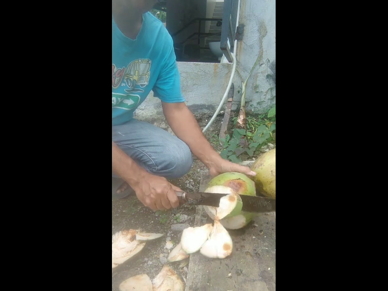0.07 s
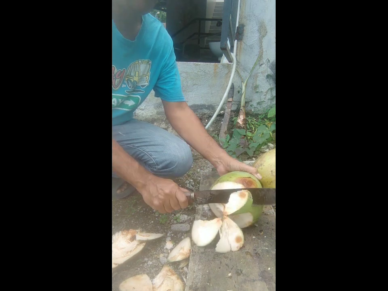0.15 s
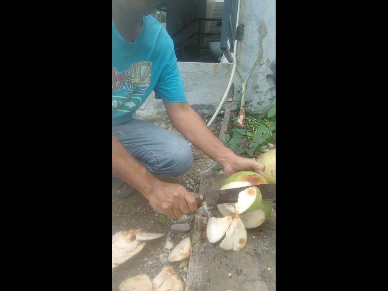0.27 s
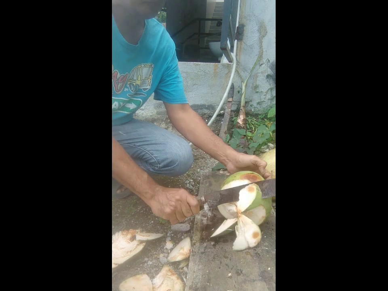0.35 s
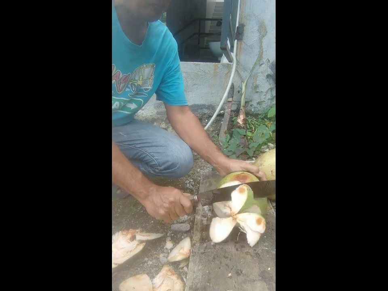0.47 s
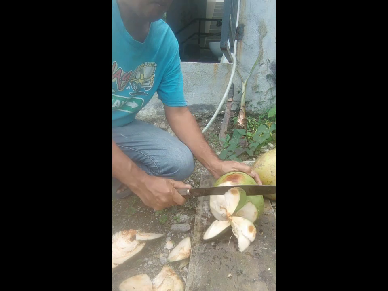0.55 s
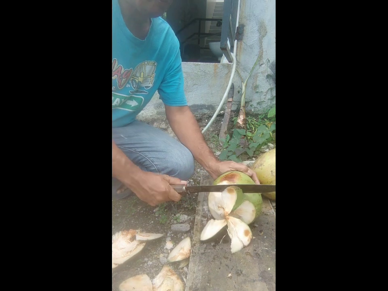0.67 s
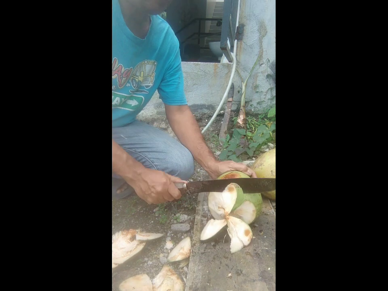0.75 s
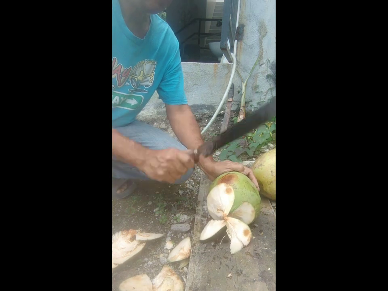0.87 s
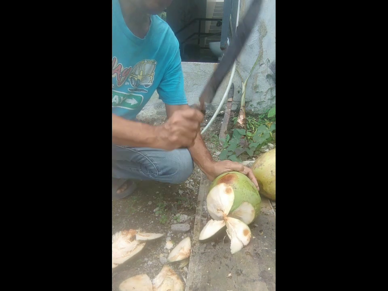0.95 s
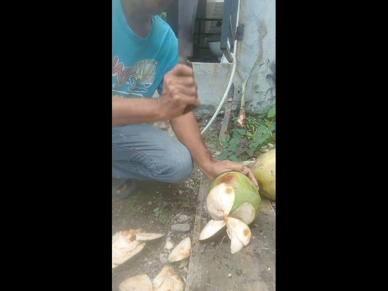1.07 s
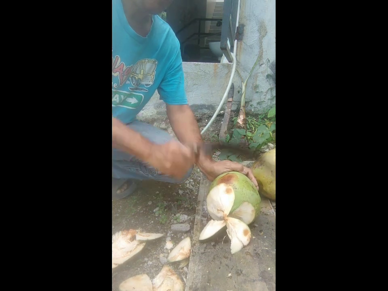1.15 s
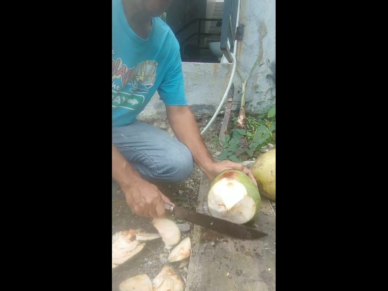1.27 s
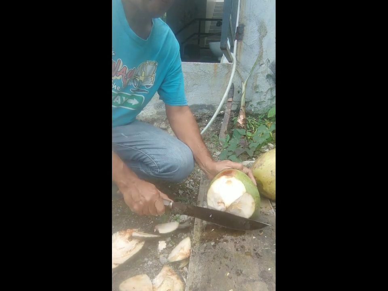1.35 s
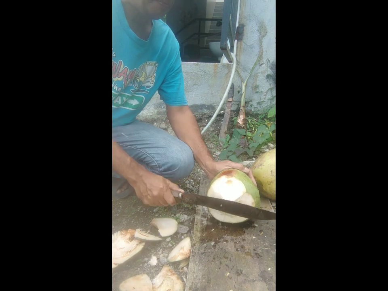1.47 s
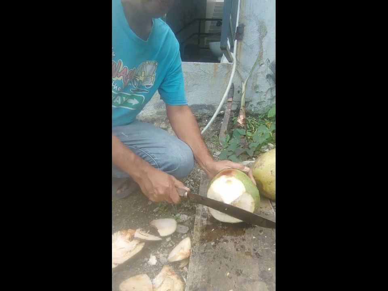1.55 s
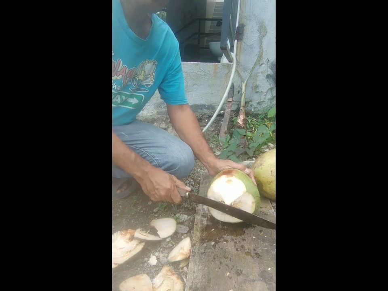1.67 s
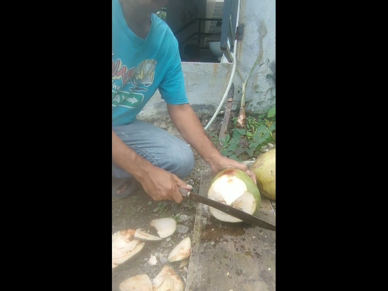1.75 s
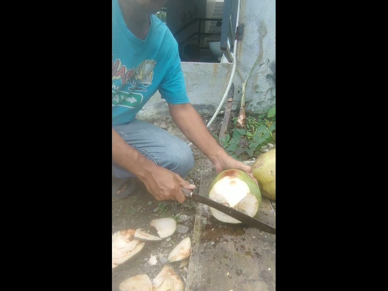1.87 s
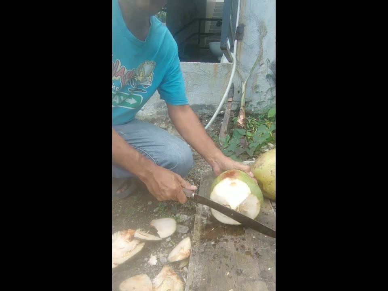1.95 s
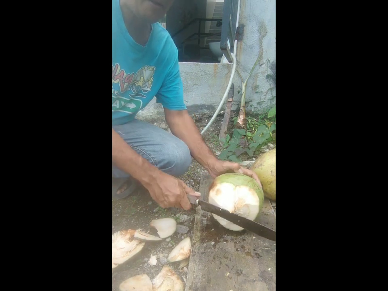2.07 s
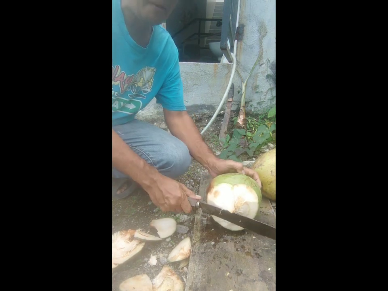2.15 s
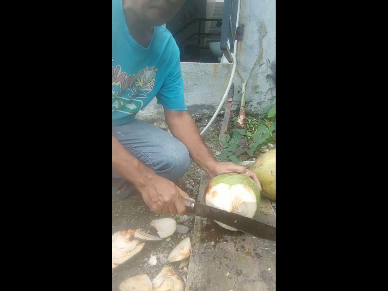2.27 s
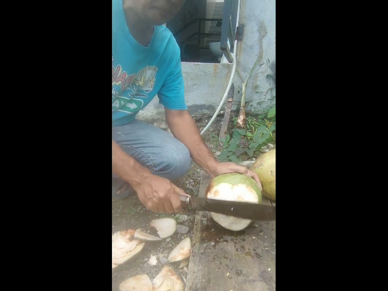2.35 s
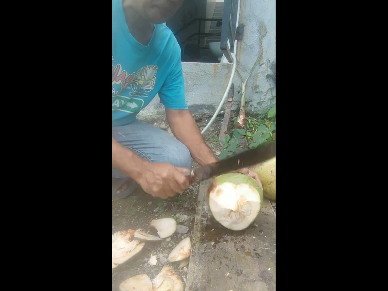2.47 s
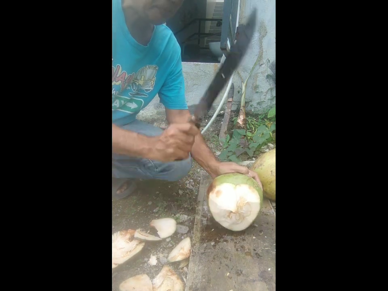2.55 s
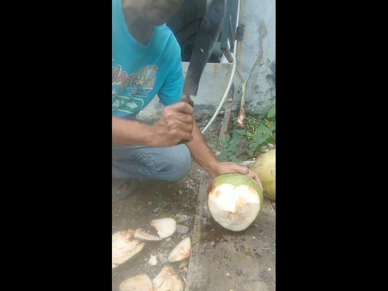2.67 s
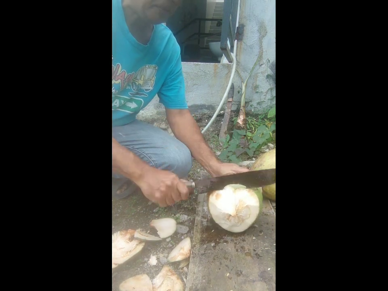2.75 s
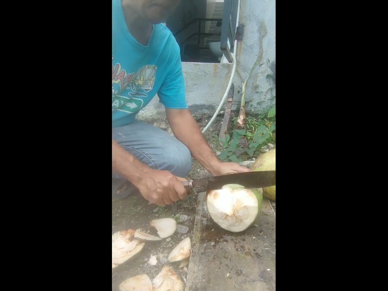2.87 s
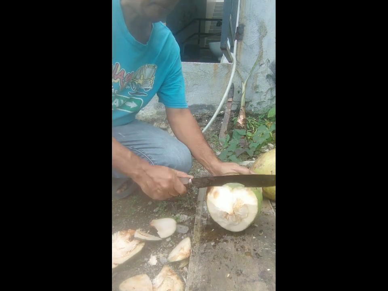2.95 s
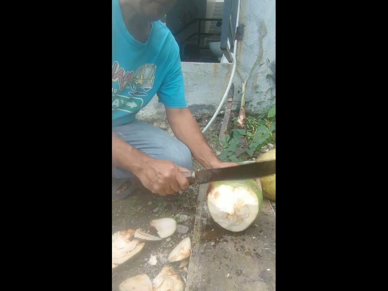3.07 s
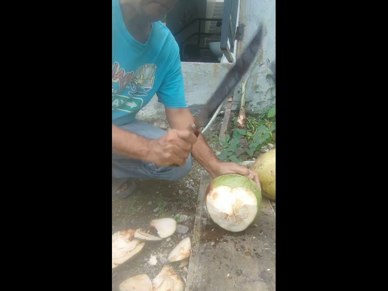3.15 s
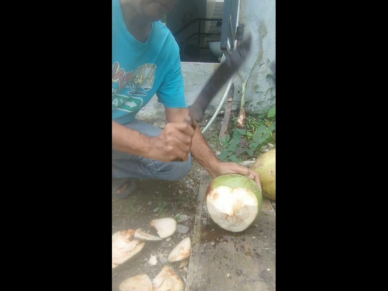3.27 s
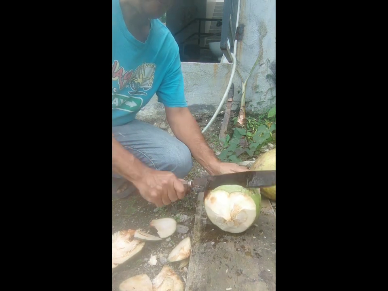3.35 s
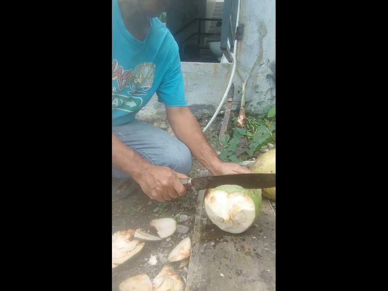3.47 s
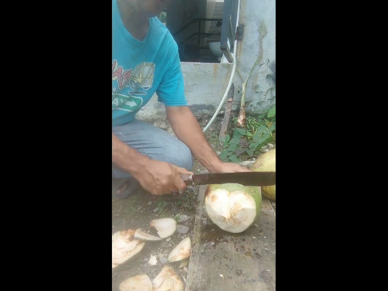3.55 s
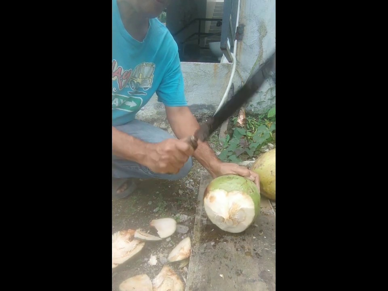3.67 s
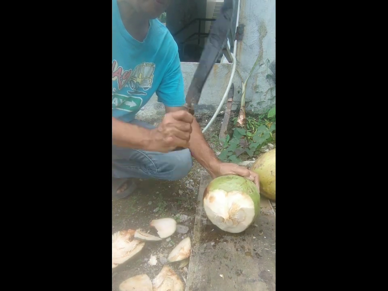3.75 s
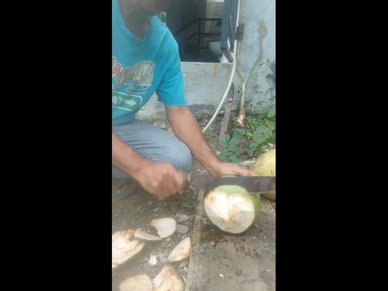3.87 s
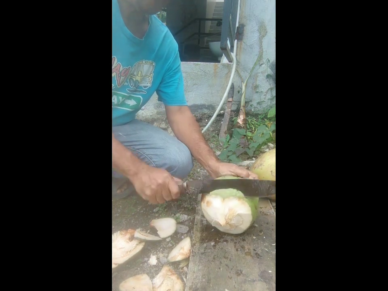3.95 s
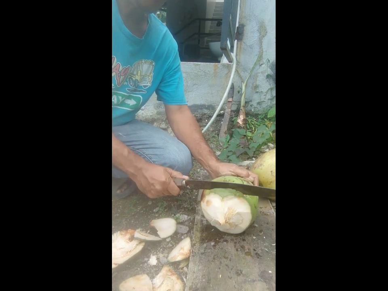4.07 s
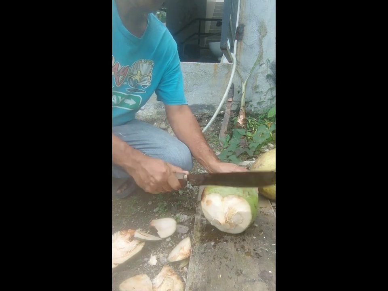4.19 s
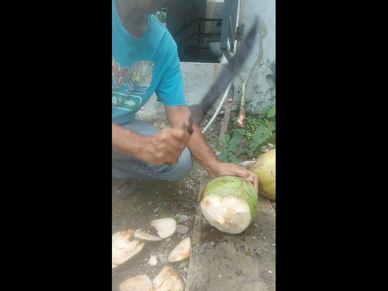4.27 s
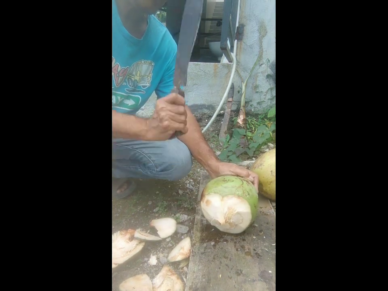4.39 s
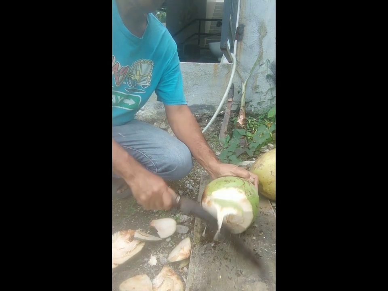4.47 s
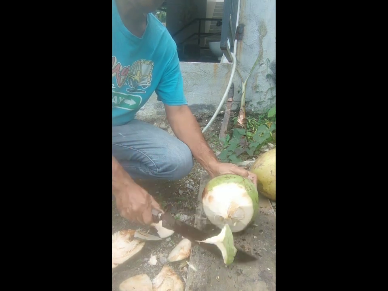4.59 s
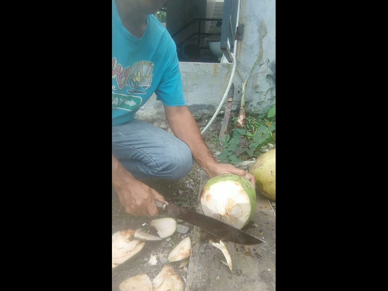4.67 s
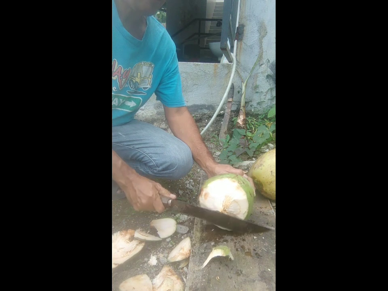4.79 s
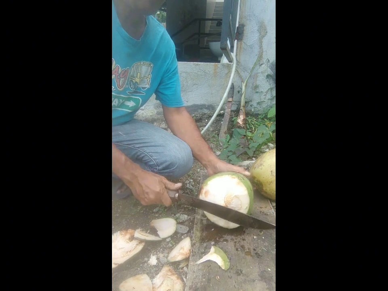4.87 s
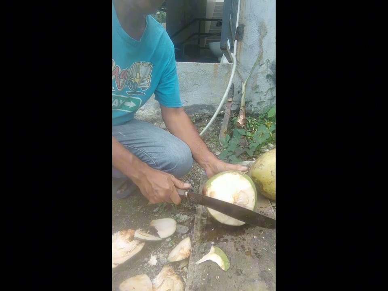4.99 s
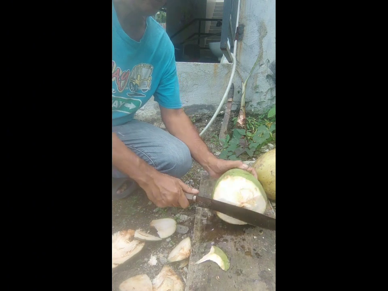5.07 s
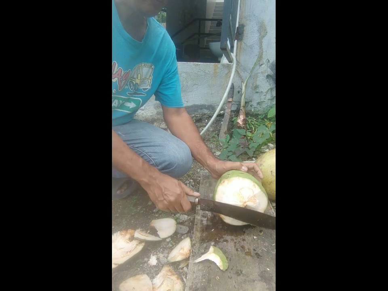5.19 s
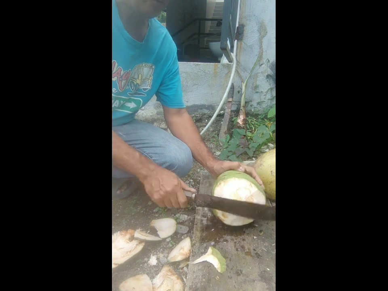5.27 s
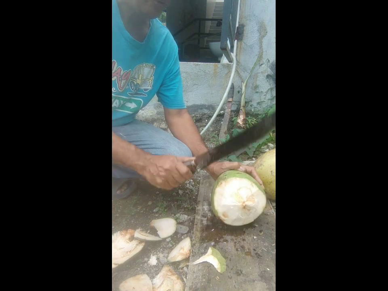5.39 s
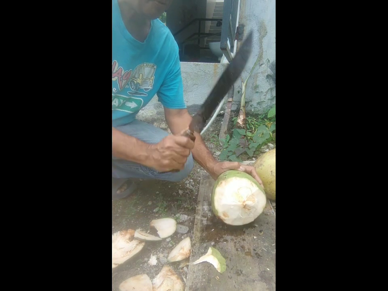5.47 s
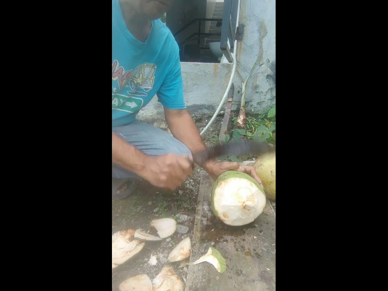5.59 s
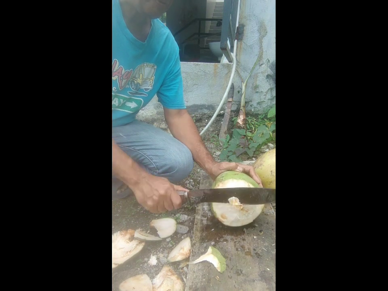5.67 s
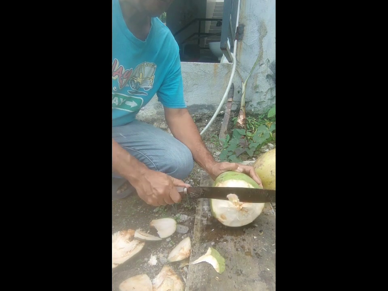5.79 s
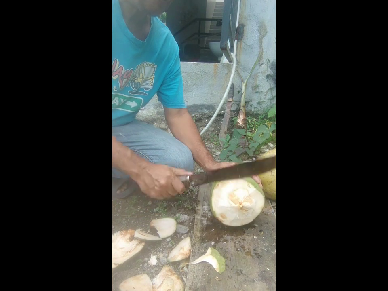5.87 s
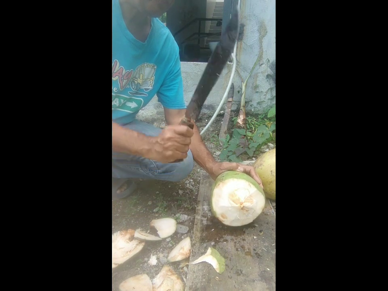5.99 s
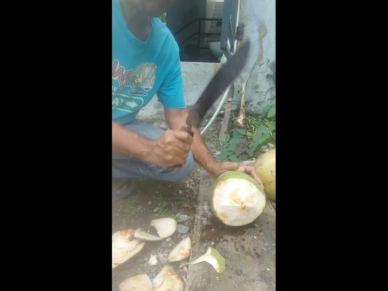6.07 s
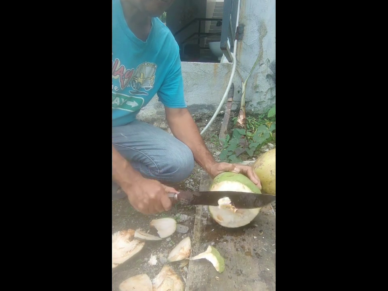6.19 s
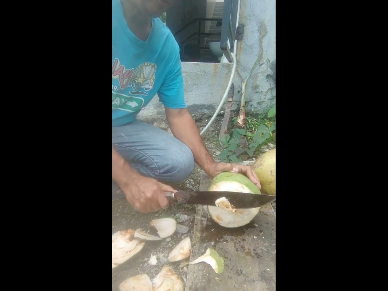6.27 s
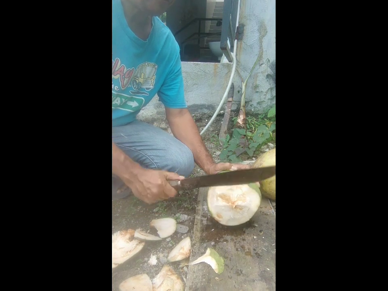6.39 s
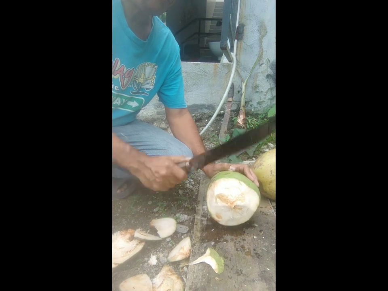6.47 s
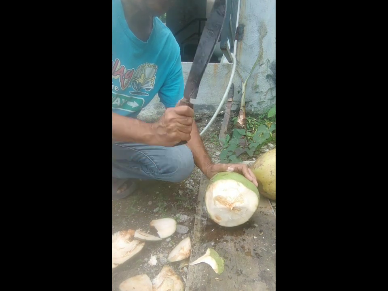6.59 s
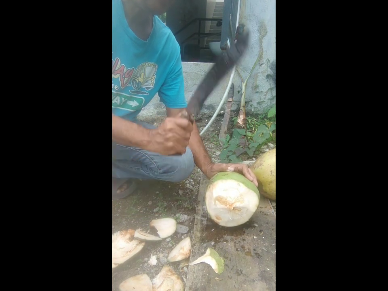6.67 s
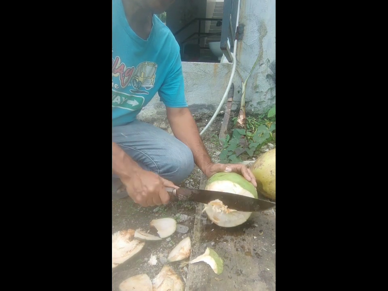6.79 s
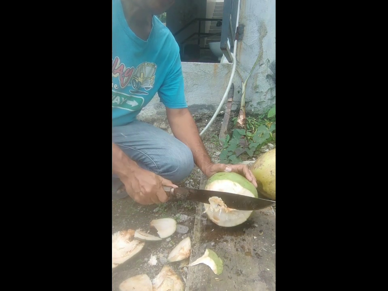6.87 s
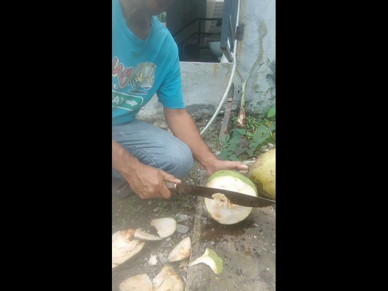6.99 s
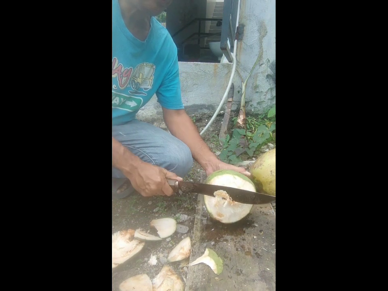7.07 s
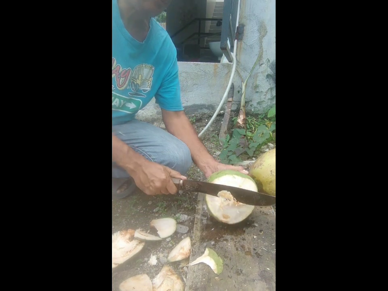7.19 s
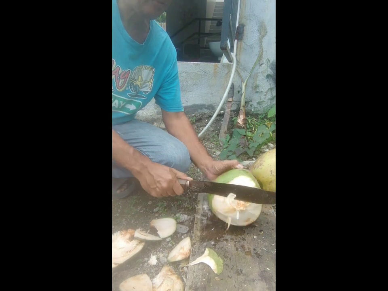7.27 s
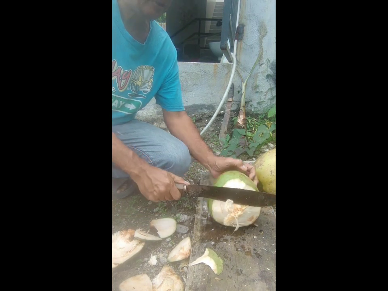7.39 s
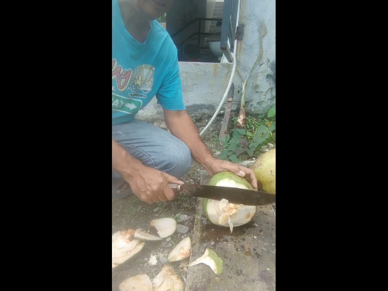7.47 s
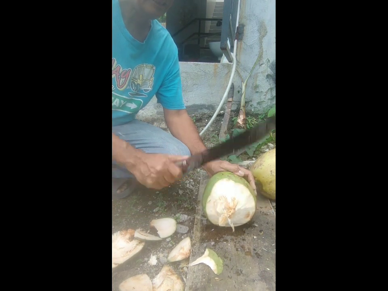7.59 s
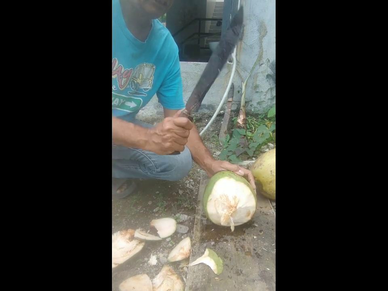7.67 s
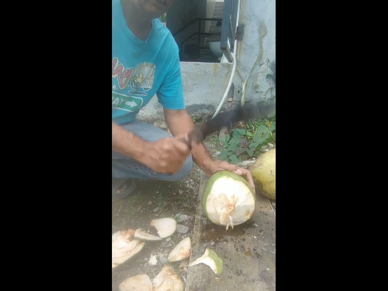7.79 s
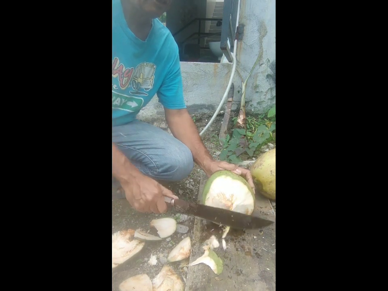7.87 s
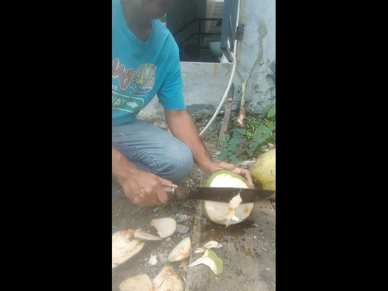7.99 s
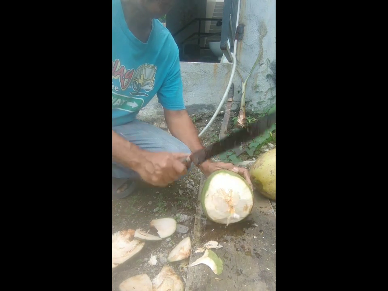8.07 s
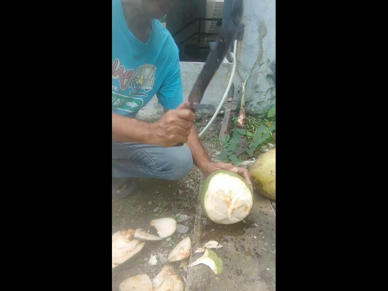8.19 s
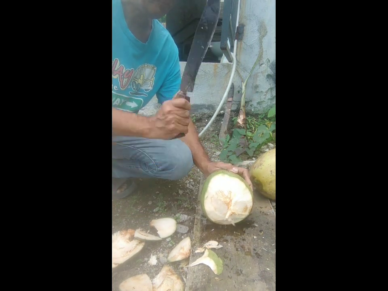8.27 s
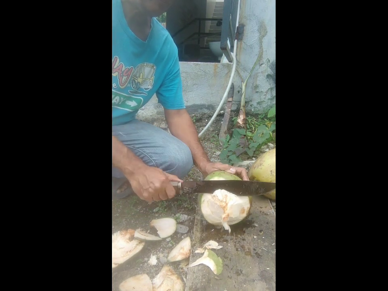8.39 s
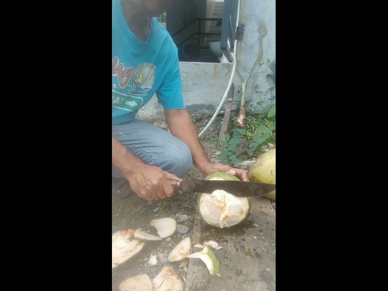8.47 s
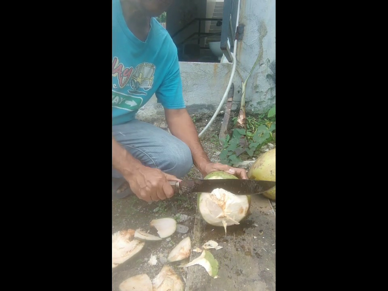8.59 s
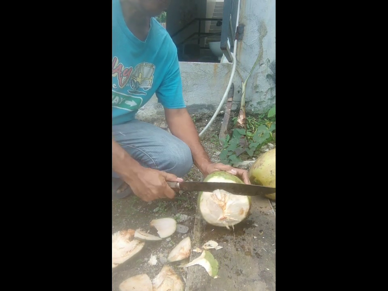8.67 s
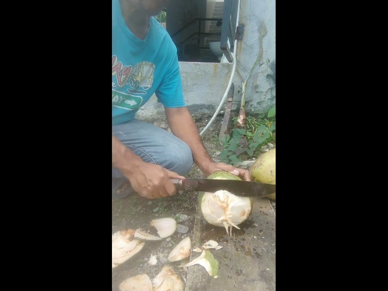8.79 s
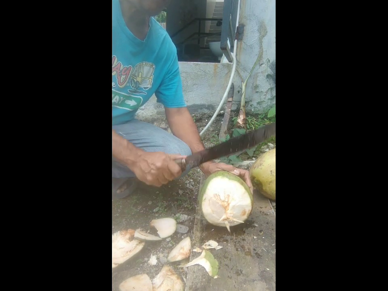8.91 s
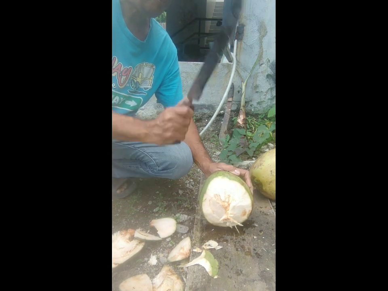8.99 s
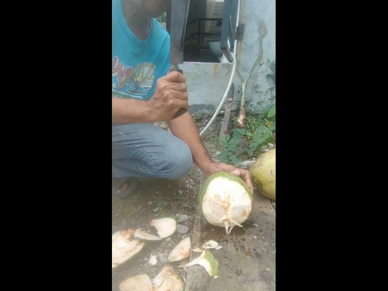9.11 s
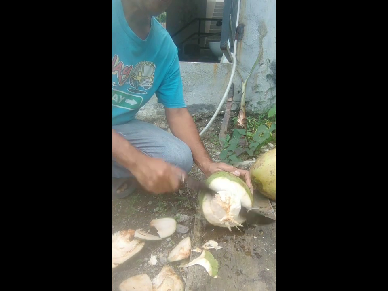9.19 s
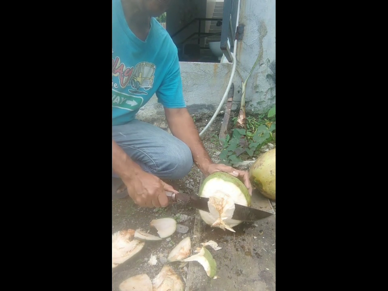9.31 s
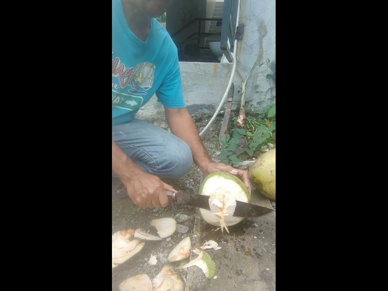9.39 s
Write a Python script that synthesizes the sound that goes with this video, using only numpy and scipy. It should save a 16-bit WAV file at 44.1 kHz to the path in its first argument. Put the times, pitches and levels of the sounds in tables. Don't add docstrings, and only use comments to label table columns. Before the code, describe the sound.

Eleven spaced machete strokes bite into wet coconut husk with bright crunches and dull thumps, between scrapes, wind buffets and distant chirps.

```python
import sys
import numpy as np
from scipy import signal
from scipy.fft import rfft, irfft
from scipy.io import wavfile
from scipy.ndimage import uniform_filter1d

SR = 44100
rng = np.random.default_rng(int(sys.argv[2]) if len(sys.argv) > 2 else 0)


def level_to_linear(level):
    exponent = np.asarray(level, float) / 20
    return 10 ** exponent


def inscribe(sig):
    pcm = np.round(np.clip(np.atleast_2d(sig).T, -1, 1) * 32767)
    wavfile.write(sys.argv[1], SR, pcm.astype(np.int16))


N = 416304


def at(s):
    return int(s * SR)


def clock(start_s, end_s):
    return np.arange(at(start_s), at(end_s)) / SR


def unit(x):
    return x / np.sqrt(np.mean(x ** 2))


def decay(t, t60):
    return 1000. ** (-t / t60)


def sine(hz, t):
    return np.sin(2 * np.pi * hz * t)


def band_noise(low_hz, high_hz, count=N):
    band = signal.butter(2, [low_hz, high_hz], "band", fs=SR, output="sos")
    return signal.sosfilt(band, rng.standard_normal(count))


def colour(x, table):
    hz, db = np.transpose(table)
    bins_hz = np.arange(2049) * SR / 4096
    log_gain = np.interp(np.log(bins_hz + 1), np.log(hz), db) * np.log(10) / 20
    cepstrum = irfft(log_gain)
    cepstrum[1:2048] *= 2
    cepstrum[2049:] = 0
    return signal.fftconvolve(x, irfft(np.exp(rfft(cepstrum))))[:len(x)]


def walk(rate):
    k = int(SR / rate)
    steps = np.repeat(rng.standard_normal(N // k + 1), k)
    return unit(uniform_filter1d(uniform_filter1d(steps, k), k)[:N])


def curve(rows, column, outside):
    rows = np.array(rows)
    return np.interp(np.arange(N) / SR, rows[:, 0], rows[:, column], outside, outside)


def add(out, s, piece):
    out[at(s):at(s) + len(piece)] += piece[:N - at(s)]


def echoes(x, t60, wet_db, first_s):
    t = clock(0, .6)
    tail = rng.standard_normal(len(t)) * decay(t, t60) * np.clip(t / first_s, 0, 1)
    tail /= np.sqrt(np.sum(tail ** 2))
    return x + level_to_linear(wet_db) * signal.fftconvolve(x, tail)[:N]


# t/s, thin fibre level/dB, thick fibre level/dB, rise/s, cut length/s
CUTS = [(1.2315, -16.5, -17, 0.0018, 0.013), (2.821, -18, -18.5, 0.00039, 0.0021),
        (3.395, -17.5, -16.5, 0.0014, 0.0012), (3.947, -15, -15.5, 0.00055, 0.0013),
        (4.5352, -16.5, -18, 0.00048, 0.0039), (5.6908, -21, -27, 0.0042, 0.0052),
        (6.2064, -19.5, -22.5, 0.0011, 0.011), (6.8147, -16.5, -18.5, 0.00071, 0.0041),
        (7.8999, -16.5, -23.5, 0.0034, 0.0058), (8.4376, -17.5, -20, 0.001, 0.003),
        (9.274, -16, -20.5, 0.0025, 0.01)]
# t/s, peak level/dB, dullness/dB
SNAPS = [(0.162, -39, -10), (0.5825, -28.5, -16), (0.6181, -20.5, -19), (0.656, -25.5, -19),
         (0.704, -25.5, -19), (2.023, -33, -15), (2.0761, -28.5, -9), (2.178, -32, -14), (4.715, -34, -19),
         (4.915, -38, -20), (2.876, -31, -28), (3.4348, -26, -19), (3.5902, -31, -13), (3.6336, -33, -13),
         (4.143, -32, -11), (4.8702, -30.5, -10.5), (5.186, -29, -13), (6.958, -35, -11),
         (8.7525, -34, -8.5), (8.8972, -30, -14.5), (9.3208, -27, -14)]
# t/s, peak level/dB, dullness/dB
CHIPS = [
    (1.2573, -15, 2.5),
    (1.2613, -10, -30),
    (1.3572, -5.5, -30),
    (1.37, -14.5, -12.5),
    (1.387, -20, -12),
    (1.58, -26, -14),
    (4.572, -31, -3),
    (4.605, -19.5, -26),
    (4.6259, -22, -32),
    (7.92, -8, -24),
]
# t/s, peak level/dB, dullness/dB
CRACKLES = [(1.4364, -32, -18), (1.4473, -28, -16), (1.4564, -28, -23), (1.4661, -30, -18),
            (1.476, -23, -22), (1.4854, -28, -9), (1.507, -24, -8), (1.514, -23, -7), (1.5254, -26, -21),
            (1.544, -19, -19), (1.5508, -11.5, -24), (1.6402, -19, -18), (1.6564, -37, -21),
            (1.6624, -32, -21), (1.7285, -34, -18), (7.2664, -33, -16), (7.2898, -31, -19),
            (7.2974, -32, -21), (7.3038, -31, -25), (7.308, -32, -19), (7.3274, -27, -15),
            (7.3337, -22, -21), (7.3454, -29, -24), (7.3494, -31, -24)]


def tearing_levels():
    thick, thin, t = np.zeros(N), np.zeros(N), clock(0, .25)
    # 18 ms when the first stroke goes clean through, 43 ms with the blade stuck in the husk
    bursts = [(*CUTS[0], 0.018)] + [(*row, 0.043) for row in CUTS[1:]]
    ticks = [(*row, 0.0085) for row in CHIPS] + [(*row, 0.021) for row in SNAPS]
    ticks += [(s, db - 5.5, dull_db, 0.012) for s, db, dull_db in CRACKLES]
    bursts += [(s, db - 9.5, db + dull_db + 4.0, .0005, 0, t60) for s, db, dull_db, t60 in ticks]
    for s, thin_db, thick_db, rise, hold, t60 in bursts:
        after = np.clip(t - rise - hold, 0, None)
        shape = np.clip(t / rise, 0, 1) ** 2 * decay(after, t60)
        add(thick, s, level_to_linear(thick_db) * shape)
        add(thin, s, level_to_linear(thin_db) * shape)
    return thick, thin


# t/s of most pressure, length/s, level/dB, dullness/dB
SCRAPES = [(1.3, .08, -52, 3), (1.335, 0.055, -37.5, 6.5), (0.2, .1, -47.5, -8), (0.872, 0.11, -48.5, -10),
           (1.471, 0.093, -30.5, -2), (1.511, 0.051, -32, 3), (1.558, 0.068, -28, -2),
           (1.641, 0.15, -39.5, 2), (1.733, 0.088, -45, 8), (1.77, 0.064, -47, 12), (1.797, 0.033, -44, 3),
           (6.874, .15, -42, 3), (7.96, .03, -51, -6), (3.029, 0.087, -43, 5), (3.12, .08, -45.5, 4),
           (3.594, 0.086, -35.5, 1), (3.652, 0.11, -50, 5), (4.16, 0.089, -36.5, 1), (4.247, 0.075, -49, 8),
           (4.603, 0.058, -32, -1), (4.639, 0.033, -31, -6), (5.118, 0.068, -47.5, -17),
           (5.205, .06, -47, 6), (7.304, 0.06, -37, 2), (7.333, 0.028, -34.5, -2), (7.349, 0.053, -35, 0),
           (7.393, 0.055, -43.5, -11)]


def scraping_levels():
    thick, thin, pith = np.zeros(N), np.zeros(N), np.zeros(N)
    press_share, fall_db = 0.49, 24.5
    grains_db, flecks_db = 2.6 * walk(300), 2.5 * walk(500)
    for s, length, db, dull_db in SCRAPES:
        span = slice(at(s - length), at(s + length))
        lag = (np.arange(span.start, span.stop) / SR - s) / length
        share = np.where(lag < 0, press_share, 1 - press_share)
        grit_db = db - fall_db * (lag / share) ** 2 + grains_db[span]
        thick[span] += level_to_linear(grit_db + dull_db - 12.0)
        thin[span] += level_to_linear(grit_db - 6.5 + flecks_db[span])
        pith[span] += level_to_linear(grit_db + dull_db - 20.5)
    return thick, thin, pith


# f/Hz, level/dB
FIBRE = [(470, -16.5), (800, -15), (1380, -18.5), (1750, -11), (2380, -13), (2870, -7.5), (3300, -5),
         (3800, -6), (5080, -7.5), (5620, -13), (7620, 1), (9100, -7.5), (12800, -20), (15500, -37),
         (16500, -24)]


def fibres():
    torn_thick, torn_thin = tearing_levels()
    dragged_thick, dragged_thin, pith = scraping_levels()
    noise = unit(colour(rng.standard_normal(N), FIBRE))
    low = signal.sosfiltfilt(signal.butter(4, 5600, fs=SR, output="sos"), noise)
    thick = (torn_thick + dragged_thick) * level_to_linear(1.1 * walk(700)) * unit(low)
    thin = (torn_thin + dragged_thin) * level_to_linear(1.45 * walk(700)) * unit(noise - low)
    return thick + thin + pith * unit(band_noise(500, 2400))


# t/s, thin level/dB, thick
# level/dB, thick f/Hz, length/s
BUNDLES = [(1.236, -12, -28, 4660, 0.0024), (1.249, -20, -6, 2630, 0.00071), (2.8238, -8, -6, 3526, 0.0014),
           (2.825, -11, -20, 3550, 0.00093), (3.3988, -1.5, -16, 3770, 0.00093),
           (3.9479, -19, -8.5, 3137, 0.00076), (3.949, -9, -15, 3430, 0.0015),
           (4.5368, -28.5, -2, 3433, 0.00069), (4.538, -16, -15, 3670, .0012),
           (4.5466, -4.5, -30, 3650, 0.0012), (4.5495, -13, -40, 3650, .001),
           (5.694, -9.5, -23, 3430, 0.0027), (5.7002, -14, -12, 3313, 0.0032),
           (6.207, -11, -25, 3080, 0.0015), (6.2131, -6, -9, 3484, 0.00072),
           (6.2161, -6, -10, 3480, 0.0016), (6.2184, -13, -28, 3450, 0.00082),
           (6.816, -8, -11, 3096, 0.00079), (6.8179, -9, -21, 4020, 0.0011),
           (6.8186, -13, -22, 3210, 0.0024), (6.831, -10, -21, 4260, 0.0014),
           (7.905, -8, -13.5, 4320, 0.0031), (7.9117, -14, -25, 4380, 0.00091),
           (8.44, -7.5, -7.5, 3220, 0.0017), (9.277, -10, -15, 4300, 0.0015),
           (9.28, -1.5, -15, 4260, 0.0012), (9.2825, -11, -21, 4290, .0015),
           (9.2876, -10, -32, 3740, 0.0021), (9.2948, -18, -32, 3700, 0.0022),
           (9.307, -18, -33, 3730, 0.0017), (2.0703, -30, -45, 3480, 0.0016),
           (2.076, -45, -31, 4450, 0.0016), (2.078, -55, -43.5, 1580, 0.0045),
           (1.548, -25, -32, 2000, .0015), (1.641, -30, -37, 5600, 0.0014), (3.958, -40, -24, 1894, 0.0023),
           (6.8162, -40, -18, 5320, 0.0028), (1.337, -36, -48, 4900, .008)]


def bundles():
    out, t = np.zeros(N), clock(-.008, .012)
    for s, thin_db, thick_db, thick_hz, length in BUNDLES:
        shape = np.exp(-(t / (np.where(t < 0, .45, .7) * length)) ** 2)
        for db, hz in [(thin_db + 1.5, 7600), (thick_db + 4.5, thick_hz)]:
            waver = 1 + 0.296 * uniform_filter1d(rng.standard_normal(len(t)), size=16)
            add(out, s + t[0], level_to_linear(db) * shape * sine(hz, np.cumsum(waver) / SR))
    return out


# t/s, peak level/dB, f/Hz, crunch level/dB, t60/s
THUDS = [(.008, -28.5, 421, -20, 0.062), (1.2578, -5.5, 606, -2, 0.017), (1.2822, -14.5, 530, -20, 0.033),
         (1.3578, -16, 620, -6, 0.028), (1.472, -43, 900, 3, .05), (1.5068, -25.5, 1260, -2, 0.034),
         (1.552, -39.5, 650, 0, 0.1), (1.578, -38.5, 930, 0, 0.033), (1.636, -45.5, 820, 7, 0.039),
         (2.8215, -25, 600, 6, 0.053), (2.833, -20, 708, -9, 0.034), (3.3974, -20, 895, 6, 0.026),
         (3.4053, -17.5, 603, 4.5, 0.029), (3.948, -20.5, 906, 4, 0.029), (3.957, -16, 424, -3, 0.04),
         (4.536, -20, 560, 5.5, 0.036), (4.5726, -3.5, 843, 0, 0.013), (4.6265, -8.5, 598, -10.5, 0.026),
         (4.574, -21, 427, -23, 0.11), (4.6, -33, 700, -3, 0.027), (4.66, -46.5, 639, -5, 0.33),
         (1.265, -22, 394, -5, 0.047), (1.364, -25.5, 527, -11, 0.061), (2.153, -44, 476, -10, .04),
         (5.1838, -31.5, 418, -13, 0.039), (5.191, -27.5, 594, -7, 0.033), (5.199, -33, 447, -18, 0.045),
         (5.697, -30.5, 408, -5.5, 0.086), (6.215, -34, 862, 1.5, 0.052), (6.817, -34, 460, -8, .09),
         (7.309, -43.5, 440, -7, 0.072), (7.905, -27.5, 950, -1, 0.036), (8.447, -22.5, 770, 2, 0.047),
         (9.29, -31, 592, 0.5, 0.059)]


def thuds():
    out, t = np.zeros(N), clock(0, .2)
    overtones = [(.62, -11), (1, 1.5), (1.42, -2.5), (1.95, -6.5), (2.7, -16)]  # ratio, level/dB
    crunch = unit(band_noise(280, 1500, N + len(t)))
    for s, db, hz, crunch_db, t60 in THUDS:
        knock = level_to_linear(crunch_db) * crunch[at(s):][:len(t)]
        knock *= np.clip(t / 0.0014, 0, 1) * decay(t, 1.05 * t60)
        for ratio, mode_db in overtones:
            mode_hz = hz * ratio * (1 + 0.0354 * rng.standard_normal())
            knock -= level_to_linear(mode_db) * sine(mode_hz, t) * decay(t * ratio ** 1.1, 0.88 * t60)
        knock -= level_to_linear(-8.0) * sine(0.847 * hz, t) * np.exp(-hz * t / 1.5)
        add(out, s, level_to_linear(db) * knock * (1 - np.exp(-t / 0.00023)))
    return out


# t/s, peak level/dB, f/Hz
BOOMS = [(1.231, -30, 199), (1.243, -27, 208), (1.318, -36, 200), (1.368, -41, 171.5), (2.856, -37, 198),
         (1.261, -23, 145), (2.832, -10.5, 166), (3.4067, -3, 175), (3.407, -21, 402), (3.9575, -6, 162),
         (4.547, -21.5, 151), (4.571, -29, 205), (4.5728, -13, 900), (1.262, -20, 760), (5.194, -27.5, 196),
         (6.82, -32.5, 165), (8.4465, -13.5, 148.5), (8.452, -27, 330), (9.29, -33, 139), (2.833, -25, 660)]


def booms():
    out, t = np.zeros(N), clock(0, .2)
    for s, db, hz in BOOMS:
        t60 = 0.043 * np.exp(-0.0472 * (db + 9.5)) * (165 / hz) ** .6
        swell = -(1 - np.exp(-t / 0.0029)) * decay(t, t60)
        add(out, s, level_to_linear(db + 4.0) * swell * (sine(hz, t) + 0.2 * sine(1.61 * hz, t)))
    return out


# t/s, held/s, first, second and third mode level/dB
RINGS = [(.84, .03, -58, -70, -70), (.7, .05, -64, -70, -70), (.875, .09, -49.5, -68, -64),
         (1.264, .085, -46, -41, -34), (1.58, .06, -49, -63, -56), (3.114, 0.075, -44.5, -57, -51),
         (3.56, 0.055, -47, -60, -42), (3.634, 0.06, -57, -66, -40.5), (4.135, 0.05, -47, -53, -55),
         (4.225, 0.11, -49, -67, -51), (4.552, 0.0087, -39, -38, -46), (4.577, 0.054, -56, -52, -36),
         (4.595, 0.15, -48, -41, -56), (4.685, 0.06, -53, -60, -64), (4.708, .025, -64, -64, -50),
         (1.325, .04, -53, -61, -54), (6.85, .08, -53, -64, -50), (4.871, 0.045, -49.5, -66, -55),
         (5.353, 0.13, -51, -63, -60), (6.817, 0.018, -38, -40, -15), (8.91, .08, -56, -66, -60),
         (7.334, .04, -61, -52, -51), (7.913, 0.13, -35, -45, -60)]
# t/s, held/s, high mode level/dB
FLICKS = [
    (6.232, .028, -55),
    (6.817, .011, -50),
    (7.921, .13, -37),
    (8.07, .03, -59),
    (8.9, .07, -58),
]
# f/Hz, t60/s
BLADE = [(4922, 0.69), (5920, 0.33), (6860, 0.29), (12750, 0.1)]
# f/Hz, level under that mode/dB
COMPANIONS = [(7750, -27), (8610, -26), (14200, -26), (15700, -27)]


def blade_rings():
    out, t = np.zeros(N), clock(0, .4)
    rings = [(*row, row[2] - 21) for row in RINGS]
    rings += [(s, held, -200, -200, -200, db) for s, held, db in FLICKS]
    for s, held, first_db, second_db, third_db, high_db in rings:
        damp = np.clip(t / 0.0015, 0, 1) * (1 + .5 * np.exp(-t / 0.014))
        damp *= np.exp(-np.clip(t - held, 0, None) / (0.003 + .16 * held))
        for (hz, t60), db in zip(BLADE, [first_db, second_db, third_db, high_db]):
            add(out, s, level_to_linear(db) * damp * decay(t, t60) * sine(hz, t + at(s) / SR))
        for (hz, under_db), db in zip(COMPANIONS, [second_db, third_db, high_db, high_db]):
            add(out, s, level_to_linear(db + under_db) * damp * decay(t, 0.24) * sine(hz, t))
    for s, db, _ in CHIPS + SNAPS:
        for hz, tip_db in [(12750, -40), (14200, -55), (15700, -55)]:
            add(out, s, level_to_linear(min(db, -26) + tip_db) * decay(t, 0.17) * sine(hz, t))
    return out * level_to_linear(1.2 * walk(30))


# t/s, level/dB
STROKE = [
    (1.735, -65),
    (1.76, -47),
    (1.788, -37),
    (1.81, -46),
    (1.83, -72),
]
# f/Hz, level/dB
STROKE_MODES = [(4936, -57), (5922, -48), (6842, -47), (7752, -56), (8619, -63), (9593, -63), (10088, -61)]


def blade_stroke():
    sing = 0
    for hz, db in STROKE_MODES:
        phase = 2 * np.pi * hz * np.arange(N) / SR + .6 * walk(60)
        sing = sing + level_to_linear(db + 1.5 * walk(59.7)) * np.sin(phase)
    return unit(sing) * level_to_linear(curve(STROKE, column=1, outside=-200))


# t/s, stick-slip f/Hz, level/dB
JUDDER = [
    (1.722, 594, -62),
    (1.735, 641, -48),
    (1.75, 733, -51),
    (1.765, 750, -47),
    (1.78, 752, -47),
    (1.792, 763, -47),
    (1.802, 750, -66),
]
# multiple, level/dB
JUDDER_ORDERS = [(2, 1.5), (3, 2), (4, -1), (5, -4), (6, -6)]


def blade_judder():
    out = np.zeros(N)
    turns = np.cumsum(curve(JUDDER, column=1, outside=0) * (1 + 0.022 * walk(200))) / SR
    level_db = curve(JUDDER, column=2, outside=-200)
    for multiple, db in JUDDER_ORDERS:
        out += level_to_linear(level_db + db + 2.0 * walk(80)) * sine(multiple, turns)
    return out


# t/s, level/dB
GUST = [(0.0, -51.5), (0.94, -56.5), (1.37, -51), (1.76, -55.5), (2.28, -53), (2.47, -40), (2.62, -50.5),
        (2.97, -47), (3.8, -50), (4.6, -50.5), (4.86, -39.5), (5.1, -45), (5.6, -43.5), (5.89, -49),
        (6.23, -47), (6.5, -49.5), (7.3, -53), (9.44, -54)]
# f/Hz, level/dB
WIND = [(15, -44), (25, -17), (64, 0), (113, 3.5), (258, -12.5), (376, -42), (475, -46), (607, -42),
        (733, -35), (800, -31), (1040, -51), (1760, -120)]


def wind():
    gust_db = curve(GUST, column=1, outside=-52)
    lumps_db = np.clip(0.24 * (gust_db + 59.5), 0, 5) * walk(35)
    rumble = unit(colour(rng.standard_normal(N) * level_to_linear(lumps_db), WIND)) * level_to_linear(gust_db + 5.5)
    flap = unit(band_noise(220, 550) * level_to_linear(4 * walk(45)))
    return rumble + flap * level_to_linear(-58 + 1.5 * (gust_db + 42))


# t/s, peak level/dB, f/Hz
BUFFETS = [(2.346, -27.5, 88.5), (2.651, -31, 110), (4.77, -31.5, 116), (4.915, -25, 149),
           (5.132, -27, 118), (5.154, -32, 131), (5.228, -33, 129), (5.272, -30, 119), (5.461, -29, 101),
           (5.633, -30, 94), (6.325, -28.5, 128), (7.611, -36, 128), (2.948, -37, 190), (5.433, -32.5, 197),
           (5.012, -33, 202), (2.404, -24.5, 128), (2.502, -22, 129), (2.929, -26, 168), (2.988, -28, 146),
           (4.859, -20, 178), (4.887, -14.5, 157), (4.953, -19.5, 138), (4.991, -23.5, 142),
           (5.381, -22.5, 96), (5.489, -23, 106), (6.009, -26, 102), (6.087, -22, 126)]


def buffets():
    out, t = np.zeros(N), clock(0, .05)
    for s, db, hz in BUFFETS:
        cycle = 2 * np.pi * hz * t
        swing = np.sin(cycle) - 0.25 * np.cos(2 * cycle) + 0.21 * np.sin(3 * cycle) / 3
        puff = hz * t * np.exp(1 - 1.92 * hz * t)
        add(out, s + 0.0018, -level_to_linear(db + 3.5) * puff * swing)
    return out


# t/s, f/Hz, level/dB
WHISTLES = [
    [(7.42, 3050, -56), (7.445, 3050, -54), (7.462, 2950, -45), (7.49, 2400, -56), (7.505, 2250, -64)],
    [(7.515, 2130, -64), (7.555, 1950, -48), (7.575, 1890, -57), (7.605, 1870, -44), (7.625, 1770, -47),
     (7.66, 1510, -45), (7.69, 1290, -52), (7.73, 1170, -64)],
    [(7.64, 1860, -64), (7.665, 1894, -54), (7.72, 1880, -58), (7.76, 1900, -66)],
    [(4.06, 1680, -62), (4.12, 1690, -59), (4.2, 1683, -58), (4.23, 1670, -66)],
    [(3.58, 1680, -64), (3.68, 1670, -62), (3.71, 1696, -50), (3.79, 1692, -55), (3.84, 1680, -67)],
]


def whistles():
    out, flutter_db = np.zeros(N), 1.5 * walk(60)
    for note in WHISTLES:
        turns = np.cumsum(curve(note, column=1, outside=0)) / SR
        out += level_to_linear(curve(note, column=2, outside=-200) + flutter_db) * sine(1, turns)
    return out


# t/s, level/dB
CHIRPS = [
    (0.025, -52),
    (0.09, -61),
    (0.2, -64),
    (0.4, -57),
    (0.347, -49),
    (0.462, -50),
    (0.581, -50),
    (0.683, -50),
    (0.788, -50.5),
    (6.29, -51),
]
# f/Hz at start, peak and end
ARCH_HZ = [2530, 2660, 2580]


def chirps():
    out, shake = np.zeros(N), walk(350)
    part = np.linspace(0, 1, at(0.059))
    phase = 2 * np.pi * np.cumsum(np.interp(part, [0, .4, 1], ARCH_HZ)) / SR
    for s, db in CHIRPS:
        add(out, s, level_to_linear(db) * np.sin(np.pi * part) * np.sin(phase + 1.9 * shake[at(s):][:len(part)]))
    return out


# f/Hz, level/dB
HISS = [(180, -28.5), (300, -1), (450, -9.5), (940, -10), (1570, -8.5), (3460, -7), (4200, -6), (5800, -15),
        (7800, -5), (9300, -17.5), (10500, -19.5), (13000, -42), (16000, -50)]
# t/s, level/dB
HISS_DB = [(0, -50), (2.5, -48.5), (6, -52), (9.44, -49.5)]


def hiss():
    return unit(colour(rng.standard_normal(N), HISS)) * level_to_linear(curve(HISS_DB, column=1, outside=-52) + 0.5)


def scene():
    husk = echoes(fibres(), t60=0.31, wet_db=-18.0, first_s=0.011)
    nut = echoes(thuds() + booms(), t60=0.17, wet_db=-16.0, first_s=0.0047)
    blade = blade_rings() + blade_stroke() + blade_judder()
    birds = echoes(whistles() + chirps(), t60=0.39, wet_db=-3.0, first_s=0.0062)
    return (husk + nut + bundles() + blade + birds + wind() + buffets() + hiss())[None]


# t/s, level/dB
GATE_DB = [(0, 0), (1, 0), (2.4, -2), (4.2, 1), (6, 4), (7.1, 0), (7.75, 4), (9.44, 1)]


def gate_treble(x):
    edge_hz, keep_db, slope_db_per_khz, release = 10500, -89, 2.5, 0.43
    hz, _, frames = signal.stft(x, SR, "cosine", nperseg=2048, noverlap=1024)
    loud = np.mean(np.abs(frames[hz > 7000]) ** 2, axis=0)
    tick = np.clip(np.log2(loud / np.median(loud)) - .8, 0, 1)
    opened = np.clip(signal.lfilter([1], [1, -0.74], tick, zi=[2.2])[0], 0, 1.6)
    gate_db = np.interp(np.arange(len(loud)) * 1024 / SR, *np.transpose(GATE_DB)) - 5 * opened
    for k in range(int(edge_hz * 2048 / SR), 1024, 16):
        power = np.abs(frames[k:k + 16]) ** 2
        need = level_to_linear(keep_db - slope_db_per_khz * (hz[k] - edge_hz) / 1000) ** 2
        wander_db = 5.0 * uniform_filter1d(rng.standard_normal(len(loud)), size=5)
        recent = signal.lfilter([1 - release], [1, -release], power.mean(axis=0), zi=[12 * need])[0]
        frames[k:k + 16] *= power ** .3 * recent ** .7 > need * level_to_linear(2 * (gate_db + wander_db))
    frames[hz > 15900] = 0
    return signal.istft(frames, SR, "cosine", nperseg=2048, noverlap=1024)[1][:N]


def band_limit(x):
    return signal.sosfilt(signal.butter(12, 16790, fs=SR, output="sos"), x)


def record(dry):
    port = signal.sosfilt(signal.butter(2, 55, "high", fs=SR, output="sos"), dry[0])
    rounded = np.tanh(port / 1.23) * 1.031
    return band_limit(gate_treble(rounded)[None])


dry = scene()
out = record(dry)
inscribe(out)
```